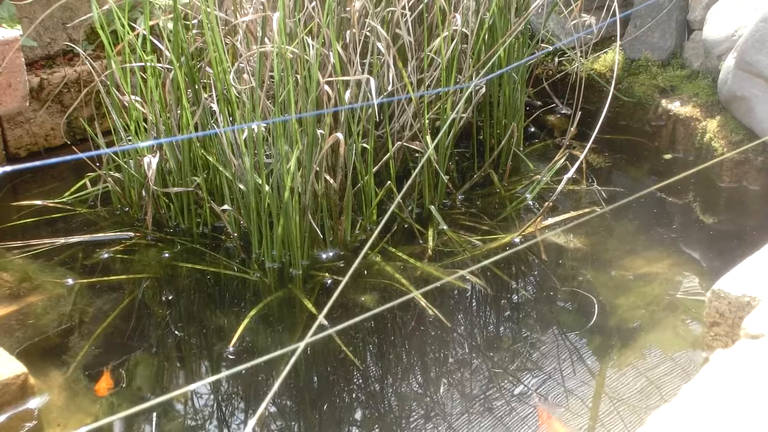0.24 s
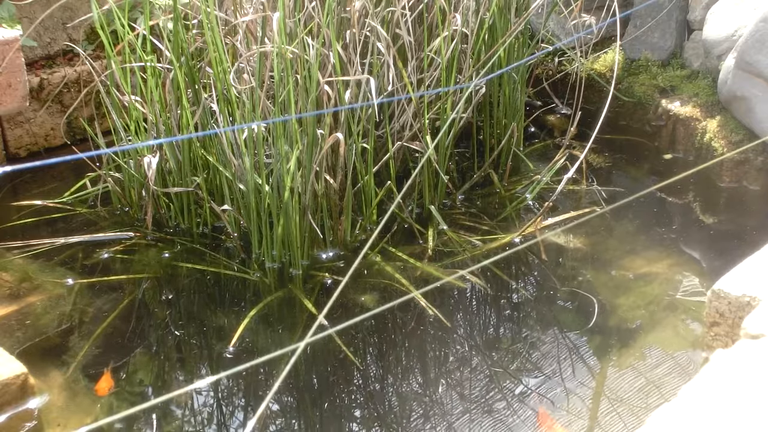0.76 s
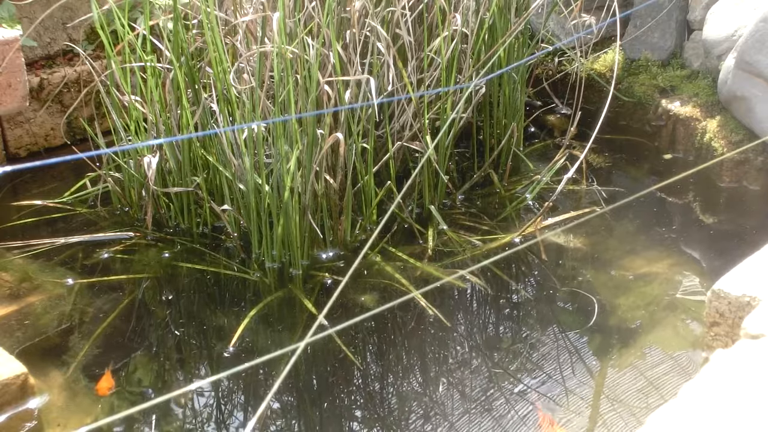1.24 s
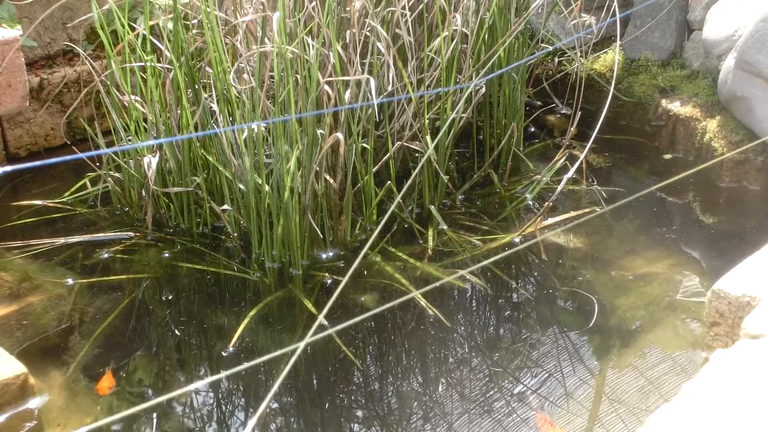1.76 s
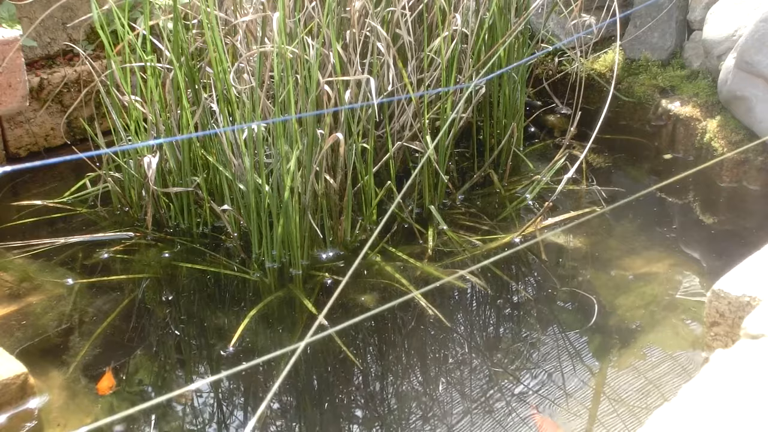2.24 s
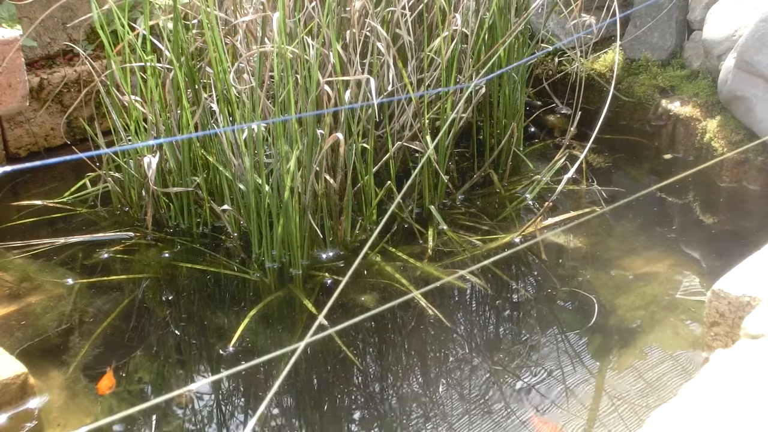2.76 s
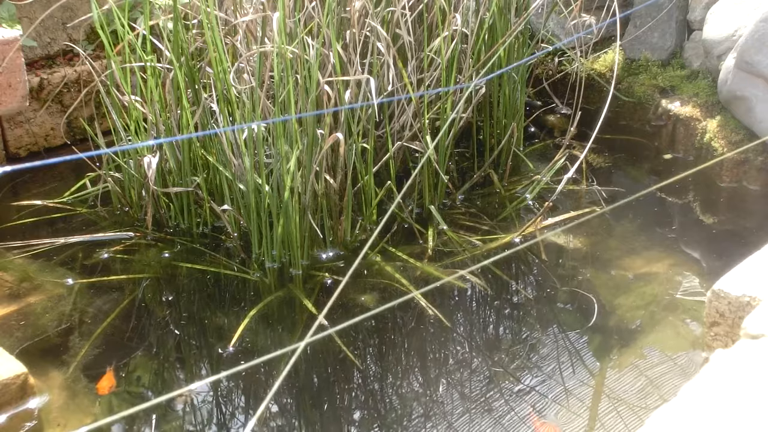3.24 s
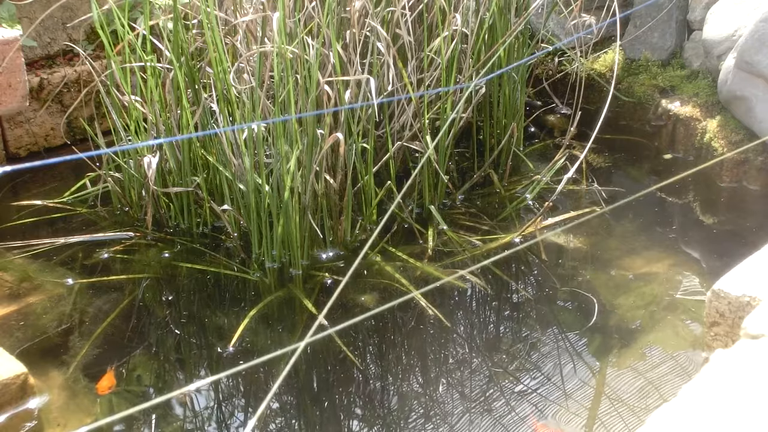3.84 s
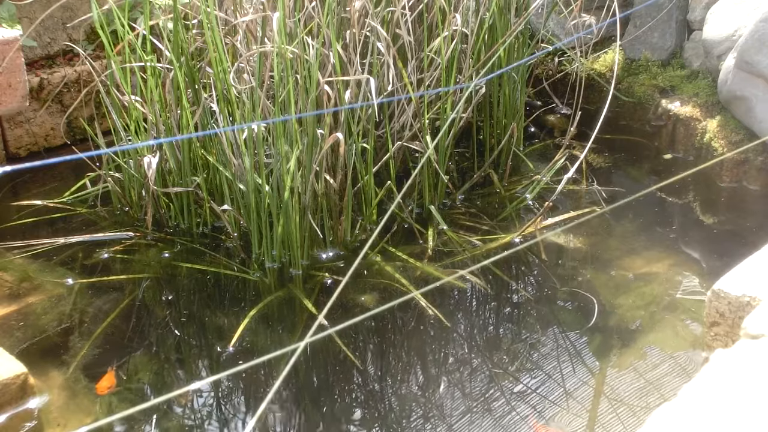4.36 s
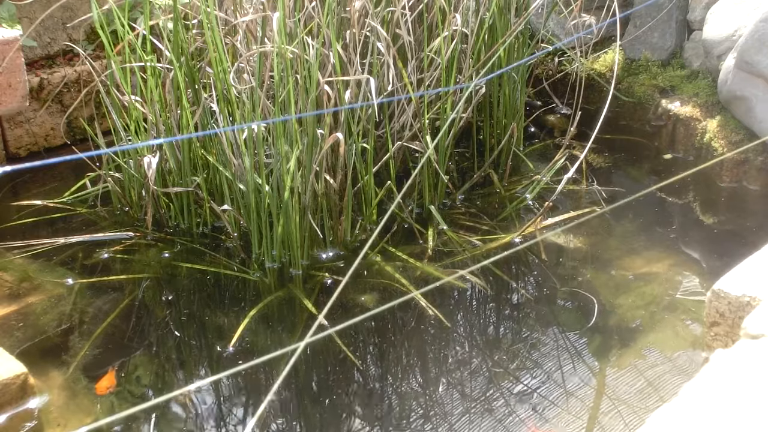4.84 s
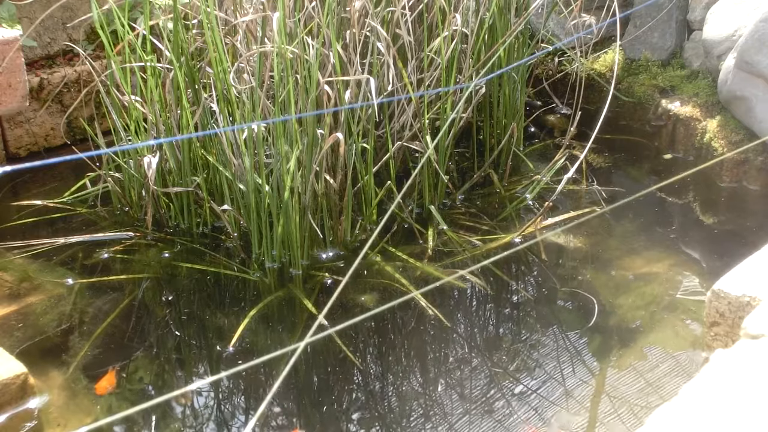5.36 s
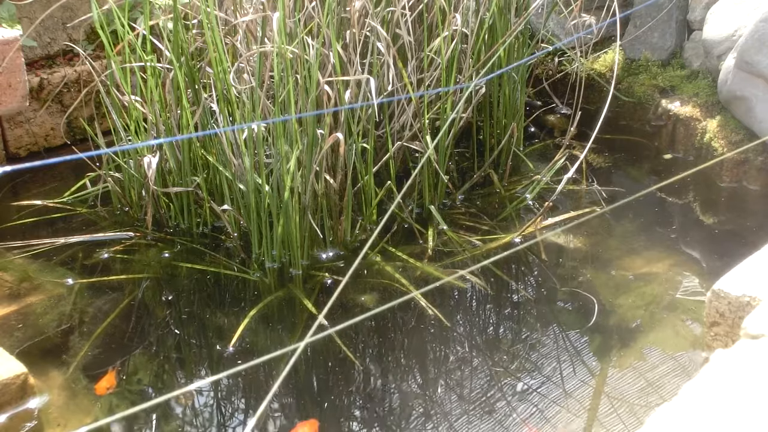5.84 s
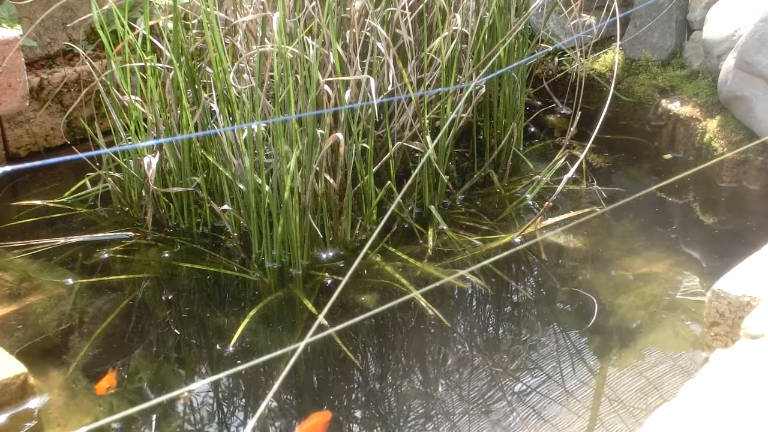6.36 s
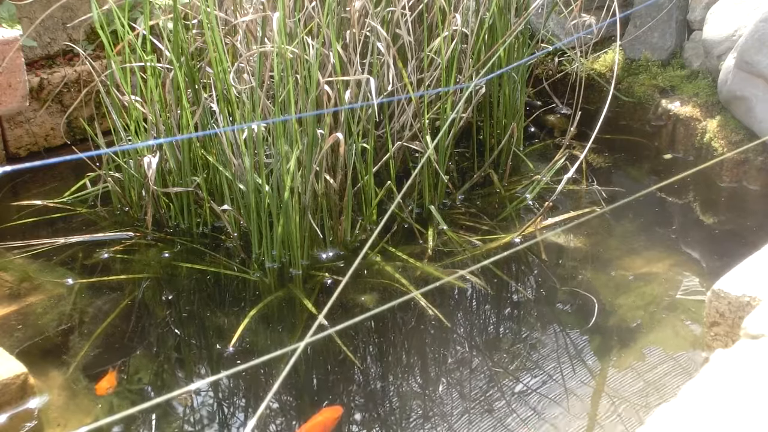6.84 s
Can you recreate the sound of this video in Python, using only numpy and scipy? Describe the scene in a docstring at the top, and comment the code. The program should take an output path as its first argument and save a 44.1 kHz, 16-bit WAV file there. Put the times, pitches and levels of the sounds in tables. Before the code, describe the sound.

Short frog croaks, each a swelling run of rapid clicks, come with brief pauses over quiet, steady outdoor background.

```python
"""At a small garden pond, a frog in the reeds gives seven rattling croaks, each a swelling run of clicks.
Every snap of its vocal cords rings its throat and its vocal sac, the balloon of skin under its chin.
Hard clicks also whistle and rasp with air. The stones round the water throw the sound back at once,
and the garden adds a short echo. Behind it lie a faint outdoor murmur, a far-off hum,
a few dull bumps and the hiss of the microphone."""
import sys
import numpy as np
from scipy import signal
from scipy.fft import rfft, irfft
from scipy.io import wavfile
from scipy.ndimage import uniform_filter1d

SR = 44100
rng = np.random.default_rng(int(sys.argv[2]) if len(sys.argv) > 2 else 0)


def transcribe(u):
    """Save the signal u as a 16-bit wav file named by the first command-line argument.

    u: samples, shape (n,) or (channels, n), limited to [-1, 1]; the rate is SR.
    q: integer samples, one column per channel.
    """
    v = np.clip(np.atleast_2d(u).T, -1, 1)
    q = np.round(v * 32767).astype(np.int16)
    wavfile.write(sys.argv[1], SR, q)


N = 313110


def undb(db):
    """Turn decibels into a number to multiply by."""
    return 10 ** (np.asarray(db) / 20)


def unit(x):
    """Scale a signal to an average strength (rms) of 1."""
    return x / np.sqrt(np.mean(x ** 2))


def along(points, hz):
    """Read between (pitch_hz, value) points, giving each octave equal room."""
    pitch_hz, value = np.transpose(points)
    return np.interp(np.log(hz + 1), np.log(pitch_hz), value)


def noise(points):
    """Noise of strength 1, shaped by (pitch_hz, level_db) points."""
    hz = np.arange(N // 2 + 1) * SR / N
    return unit(irfft(rfft(rng.standard_normal(N)) * undb(along(points, hz)), N))


def band(x, low_hz, high_hz):
    """Keep the sound between two pitches."""
    edges_hz = [low_hz, min(high_hz, SR / 2 - 100)]
    return signal.sosfilt(signal.butter(2, edges_hz, "band", fs=SR, output="sos"), x)


def drift(rate_hz):
    """A slow, smooth random wobble of strength 1."""
    size = int(SR / rate_hz)
    held = np.repeat(rng.standard_normal(N // size + 1), size)
    return unit(uniform_filter1d(uniform_filter1d(held, size), size)[:N])


def add(track, start_s, sound):
    """Mix a sound into a track at the given time."""
    i = max(int(round(start_s * SR)), 0)
    part = sound[..., :max(N - i, 0)]
    track[..., i:i + part.shape[-1]] += part


def ring(t, tones, tuning, damping=1):
    """Tones struck together; each fades by 60 dB in fade_s / damping seconds."""
    return sum(undb(db - 60 * damping * t / fade_s) * np.sin(2 * np.pi * hz * tuning * t)
               for hz, fade_s, db in tones)


# outdoor murmur and microphone hiss: pitch_hz, relative_level_db
MURMUR = [(10, -27), (25, -11), (85, -15), (145, -15.5), (215, -8), (275, -4), (400, -4), (620, -4),
          (950, -7.5), (1250, -12.5), (1650, -13), (2850, -20), (11500, -25), (15500, -27)]
# how alike the murmur is left and right: pitch_hz, likeness (0 to 1)
MURMUR_LIKENESS = [(60, 0.43), (300, 0.86), (640, 0.87), (1400, 0.72), (3100, 0.094), (7000, 0.014)]
# rise and fall of the distant rumble: time_s, change_db
RUMBLE_SWELL = [(0, 2.5), (.6, 3.5), (1.3, 1.5), (2.4, 2.5), (3.4, -0.9), (4.2, 1), (5.0, -1.1), (6.1, 0.5),
                (7.1, -2.5)]
def outdoors(level_db=-55, sway_db=0.57, rumble_top_hz=900):
    """A distant murmur under a steady, wide hiss; the low rumble slowly rises and falls."""
    hz = np.arange(N // 2 + 1) * SR / N
    likeness = np.clip(along(MURMUR_LIKENESS, hz), 0, 1)
    time_s, change_db = np.transpose(RUMBLE_SWELL)
    swell = undb(np.interp(np.arange(N) / SR, time_s, change_db) + sway_db * drift(9))
    low = 1 / (1 + (hz / rumble_top_hz) ** 4)
    parts = []
    for weight in (1, np.sqrt((1 - likeness) / (1 + likeness))):
        spectrum = rfft(noise(MURMUR)) * weight
        parts.append(swell * irfft(spectrum * low, N) + irfft(spectrum * (1 - low), N))
    middle, side = parts  # what both ears share, and what sets them apart
    return undb(level_db) * np.array([middle + side, middle - side])


# tones of a far-off hum: pitch_hz, level_db
HUM_TONES = [(84, -85.5), (275, -77.5), (623, -69.5), (995, -76.5), (1835, -81)]
def hum():
    """Faint tones that waver on their way from far off."""
    turn = 2 * np.pi * np.arange(N) / SR
    return sum(undb(db) * (drift(8) * np.sin(hz * turn) + drift(8) * np.cos(hz * turn))
               for hz, db in HUM_TONES)


# soft, distant bumps: peak_s, half_length_s, pitch_hz, level_db
FAR_BUMPS = [(1.865, 0.022, 320, -57), (2.272, 0.047, 368, -50.5), (4.093, 0.027, 370, -55),
             (4.706, 0.033, 284, -56.5)]
def bumps(width=1.124):
    """Dull bumps from far off, each a brief swell of low noise."""
    t = np.arange(N) / SR
    track = np.zeros(N)
    for peak_s, half_length_s, hz, db in FAR_BUMPS:
        swell = np.exp(-((t - peak_s) / half_length_s) ** 2 / 2)
        track += undb(db) * swell * unit(band(rng.standard_normal(N), hz / width, hz * width))
    return track


# echoes off the stones round the pond: delay_ms, gain (minus flips the wave)
STONE_ECHOES = [(1.98, -.28), (2.48, .19), (3.29, .16), (3.78, -.14), (4.46, -.09), (4.93, .07),
                (8.2, -.06)]
# echoes off the garden walls: delay_s, level_db
WALL_ECHOES = [(0.0186, -36), (.037, -21)]
# blurred echoes, first the reeds, then the garden: low_hz, high_hz, fade_s, level_db
BLURRED_ECHOES = [(2360, 17500, 0.017, -9), (795, 1130, 0.076, -10), (740, 1110, 0.33, -10.5),
                  (1390, 2970, 0.25, -20), (2360, 6500, 0.21, -18)]
def pond(voice, spread=0.49, build_s=0.0093):
    """The voice arrives directly, then bounces back from stones, walls, reeds and garden."""
    t = np.arange(SR // 2) / SR
    arrivals = np.zeros(len(t))
    arrivals[0] = 1
    for delay_ms, gain in STONE_ECHOES:
        arrivals[round(delay_ms * SR / 1000)] += gain
    for delay_s, db in WALL_ECHOES:
        arrivals[round(delay_s * SR)] += undb(db)
    echoes = np.array([arrivals, arrivals])
    for low_hz, high_hz, fade_s, db in BLURRED_ECHOES:
        shape = undb(-60 * t / fade_s) * (1 - np.exp(-t / build_s))
        middle, side = rng.standard_normal((2, len(t))) * shape
        tail = np.array([middle + spread * side, middle - spread * side]) / np.linalg.norm(middle)
        echoes += undb(db) * band(tail, low_hz, high_hz)
    return signal.fftconvolve(voice, echoes, axes=1)[:, :N]


# hiss of the frog's breath: pitch_hz, relative_level_db
BREATH = [(2500, -2), (4300, -3), (5700, 7), (6700, -7), (7900, -3), (9300, -2.5), (10700, -8),
          (14500, -10), (16000, -25)]
def rasp(puffs, spread=0.65):
    """Air forced out with each click hisses, a little differently in each ear."""
    return puffs * (noise(BREATH) + spread * noise(BREATH) * np.array([[1], [-1]]))


# whistles of a full-strength click: pitch_hz, fade_s, relative_level_db
WHISTLE_TONES = [(5730, 0.011, -30.5), (6690, 0.024, -35), (9190, 0.0094, -29.5)]
def whistle(t, weaker_db, chance, rise_s=0.00032):
    """Thin whistles that sink in pitch as the sac fills and the clicks grow stronger."""
    tuning = 1 + 0.023 * min(weaker_db, 10) + 0.017 * chance
    return ring(t, WHISTLE_TONES, tuning) * (1 - np.exp(-t / rise_s))


# tones of the throat: pitch_hz, fade_s (before damping), relative_level_db
THROAT_TONES = [(2730, 0.0055, -29.5), (3130, 0.012, -18.5), (3430, 0.011, -19.5), (3744, 0.011, -24)]
def throat(t, is_snap, chance, rise_s=0.00024, low_hz=2450, high_hz=4200):
    """Each click rings the throat; it tightens on a croak's closing snap, ringing higher and shorter."""
    tuning = 1 + 0.016 * chance + 0.061 * is_snap
    tones = ring(t, THROAT_TONES, tuning, damping=1.25 + 0.34 * is_snap)
    return undb(0.7 + 5.6 * is_snap) * band(tones * (1 - np.exp(-t / rise_s)), low_hz, high_hz)


def sac(t, hz, rise_s=0.00077, sharpness=2.7):
    """The vocal sac's ring swells quickly and dies away in a few vibrations."""
    return (t / rise_s * np.exp(1 - t / rise_s)) ** sharpness * np.sin(2 * np.pi * hz * t)


FULL_DB, CLICKS_PER_S = -9, 53  # a full-strength click; the pace while the frog is fresh
def near(times_s, moments_s):
    """Mark the clicks that fall on one of the given moments."""
    return np.min(np.abs(times_s[:, None] - np.array(moments_s)), axis=1) < .5 / CLICKS_PER_S


# where a faltering croak breaks through in one round pop: time_s
POP_TIMES = [.256, .7985]
# where the cords miss a click: time_s
MISS_TIMES = [3.812]
def croak(start_s, tires_s, end_s, tired_per_s, full_db, depth_db, swell_s, top_hz, snap_db,
          lead_s=.026, release_db=7, release_s=0.024, slack_hz=1700, snap_hz=1517):
    """Plan one croak's clicks: a lone tick, a swelling run, a tired and often slower run, a snap."""
    fresh = np.linspace(start_s, tires_s, round((tires_s - start_s) * CLICKS_PER_S), endpoint=False)
    tired = np.linspace(tires_s, end_s, round((end_s - tires_s) * tired_per_s) + 1)
    times_s = np.concatenate([[start_s - lead_s], fresh, tired])
    progress = np.clip((times_s - start_s) / (end_s - start_s), 0, 1)
    is_snap, is_pop = times_s == times_s[-1], near(times_s, POP_TIMES)
    # air pressure swells, holds and gives out; the sac tightens and slackens with it
    swell_db = -depth_db * (1 - np.clip((times_s - start_s) / swell_s, 0, 1)) ** 2
    drop_db = release_db * np.exp((times_s - end_s) / release_s)
    sac_hz = np.interp(progress, [0, 0.39, 1], [slack_hz, top_hz, slack_hz])
    # a pop is louder, lower and less throaty than its neighbours
    db = np.where(is_snap, snap_db, full_db + swell_db - drop_db + 5.5 * is_pop)
    hz = np.where(is_snap, snap_hz, sac_hz - 90 * is_pop)
    throat_db = 4.5 - 6 * progress - .2 * (db - FULL_DB) - 4.5 * is_pop
    # a click that sticks comes late, weaker, higher and throatier; tired cords keep time less well
    stick = rng.standard_normal(len(times_s)) * ~(is_snap | is_pop)
    late_s = .0004 + .25 * (times_s > tires_s) * abs(1 / tired_per_s - 1 / CLICKS_PER_S)
    clicks = np.column_stack([times_s + late_s * stick, db - 0.9 * stick, hz + 35 * stick,
                              throat_db + 2.5 * stick, is_snap])
    return clicks[~near(times_s, MISS_TIMES)]


# the seven croaks: start_s, tires_s, end_s, tired_clicks_per_s, full_level_db,
# swell_depth_db, swell_length_s, top_pitch_hz, snap_level_db
FROG_CROAKS = [(.082, 0.2137, .3001, 46, -18.5, 27.5, 0.26, 1820, -22),
               (0.5233, 0.6448, .8225, 38.6, -19.5, 20, 0.31, 1740, -23),
               (1.5091, 1.719, 1.7815, 30, -14, 26, 0.15, 1824, -23.5),
               (2.938, 3.1436, 3.2005, 53, -12.5, 26.5, 0.13, 1870, -17),
               (3.7566, 3.9979, 4.057, 52, -10, 24, 0.18, 1870, -16),
               (5.635, 5.8728, 5.9312, 54.2, -10, 26.5, .16, 1866, -16),
               (6.199, 6.4585, 6.5382, 50, -9.5, 25.5, .15, 1820, -18.5)]
def frog(sac_db=-.8, slip_db=-22, thud_db=-45, rasp_db=-36, crack_db=5, puff_s=0.0028):
    """The cords click, ringing the sac and throat; hard clicks also whistle and rasp."""
    t = np.arange(SR // 25) / SR
    voice, puffs = np.zeros(N), np.zeros(N)
    clicks = [click for row in FROG_CROAKS for click in croak(*row)]
    for start_s, db, hz, throat_db, is_snap in clicks:
        chance = rng.standard_normal(4)
        force = undb(db - FULL_DB)
        add(voice, start_s, undb(sac_db) * force * sac(t, hz))
        add(voice, start_s, undb(throat_db) * force * throat(t, is_snap, chance[0]))
        add(voice, start_s, force ** 2.2 * whistle(t, FULL_DB - db, chance[1]))
        # under high pressure the cords slip a little just before they click
        early_s = .0024 + .0006 * chance[2]
        add(voice, start_s - early_s, undb(slip_db + 3 * chance[3]) * force ** 1.6 * sac(t, 1.16 * hz))
        # each click pushes out a little air: a faint low thud and a puff
        thud = np.exp(-t / 0.0019) * (1 - np.exp(-t / 0.000099))
        add(voice, start_s, undb(thud_db) * force * thud)
        crack = undb(crack_db) * force * np.exp(-t / 0.00044)  # hard clicks open with a crack
        add(puffs, start_s, undb(rasp_db) * force ** 0.98 * (np.exp(-t / puff_s) + crack))
    voice -= 0.73 * band(voice, 185, 820)  # such a small body gives off little low sound
    return undb(FULL_DB) * (voice + rasp(puffs))


def scene():
    """The frog straight ahead across the pond, with the distant sounds behind it."""
    return pond(frog()) + outdoors() + hum() + bumps()


def record(dry, balance_db=-1.0, top_hz=15750):
    """The left microphone is slightly weaker, and the highest treble is cut off sharply."""
    sound = dry * undb(np.array([[balance_db], [-balance_db]]) / 2)
    return signal.sosfilt(signal.ellip(10, .2, 70, top_hz, fs=SR, output="sos"), sound)


dry = scene()
out = record(dry)
transcribe(out)
```